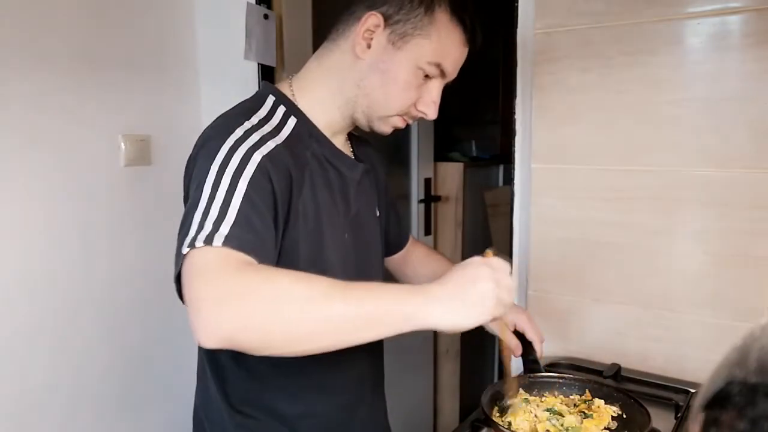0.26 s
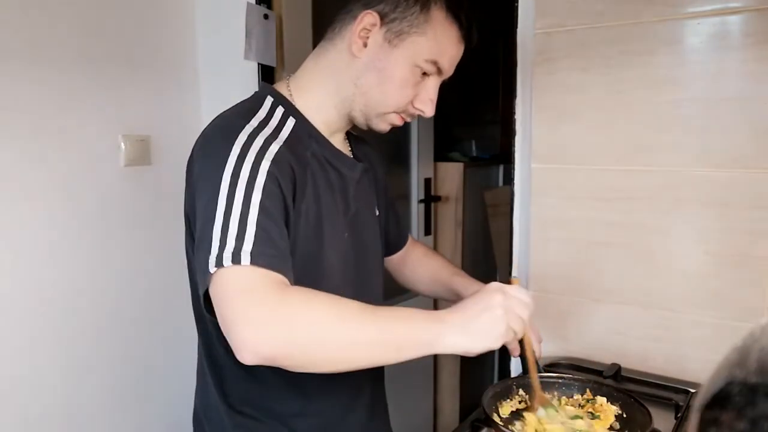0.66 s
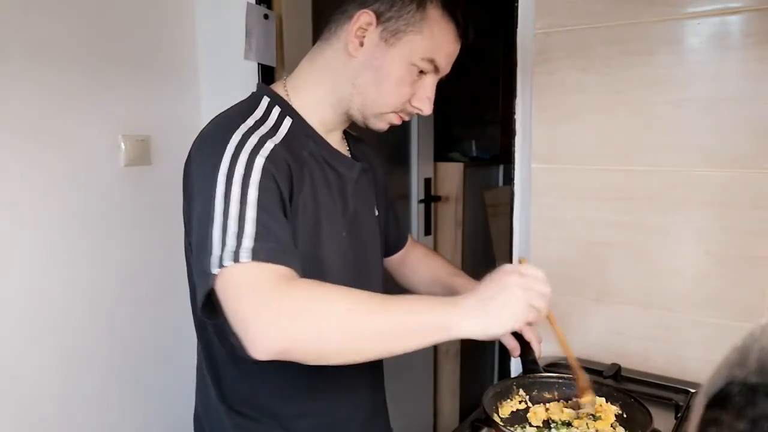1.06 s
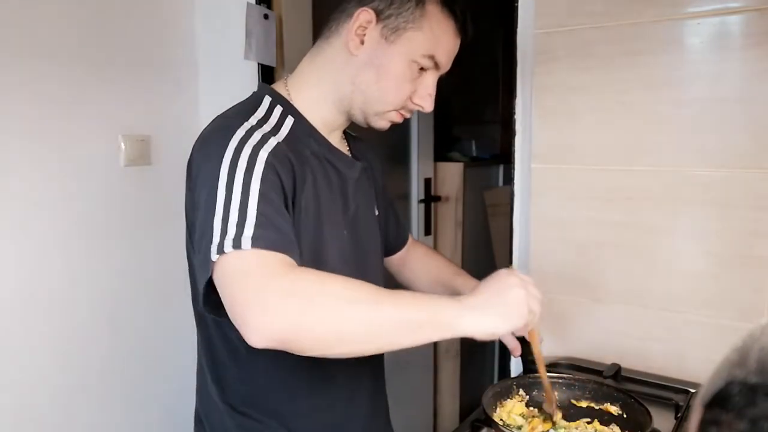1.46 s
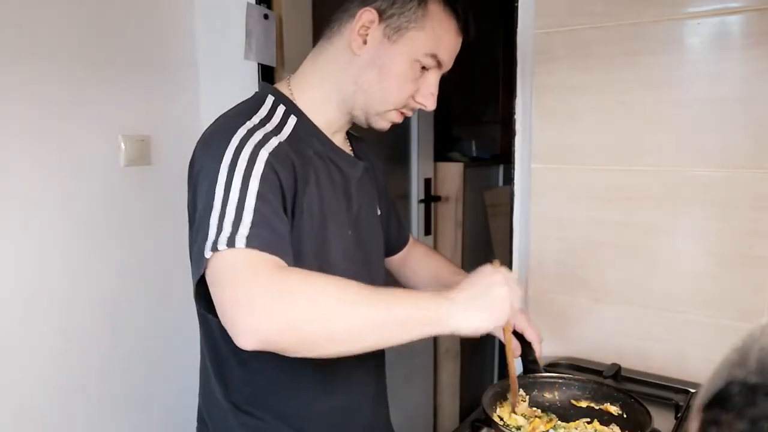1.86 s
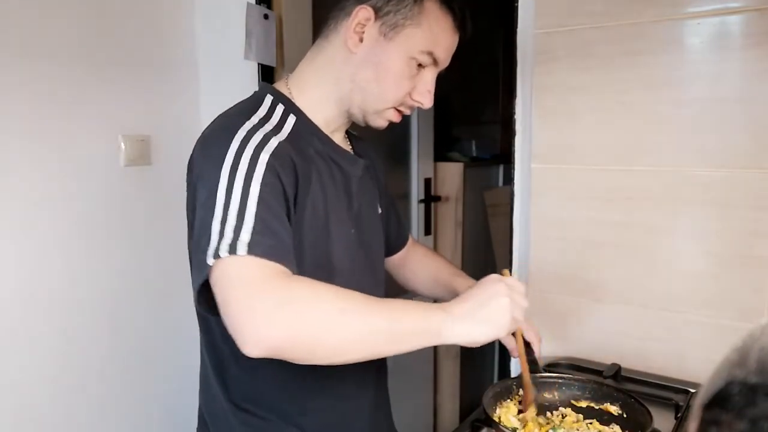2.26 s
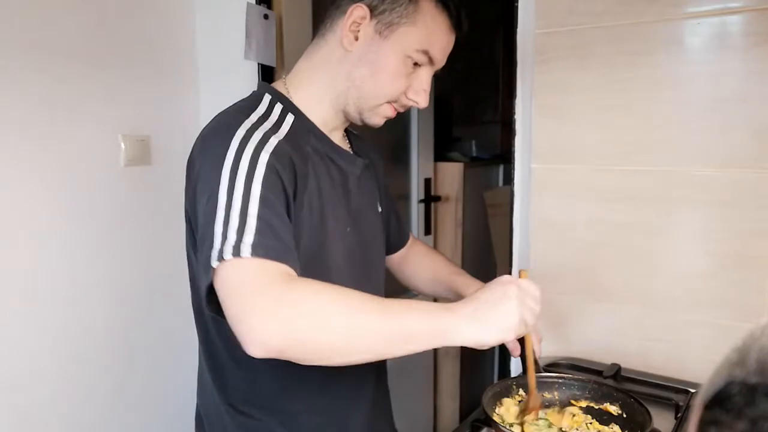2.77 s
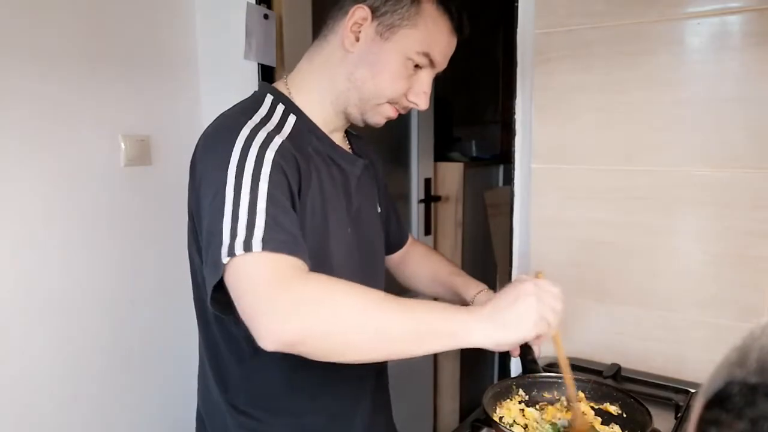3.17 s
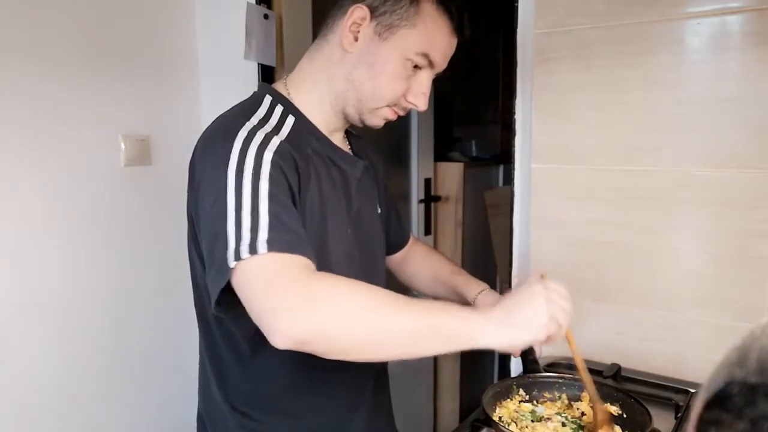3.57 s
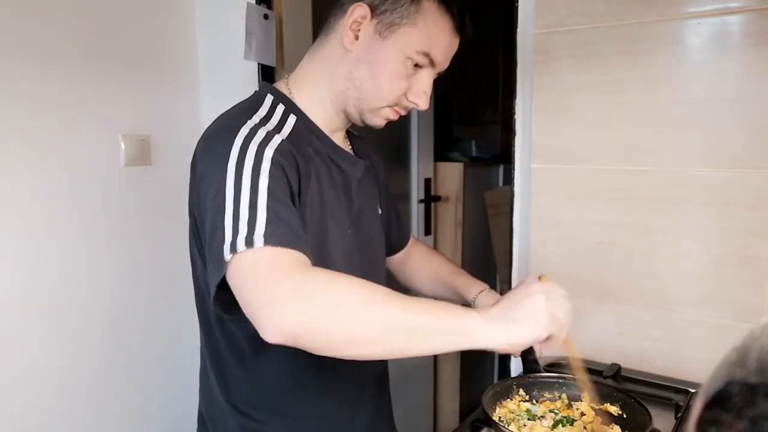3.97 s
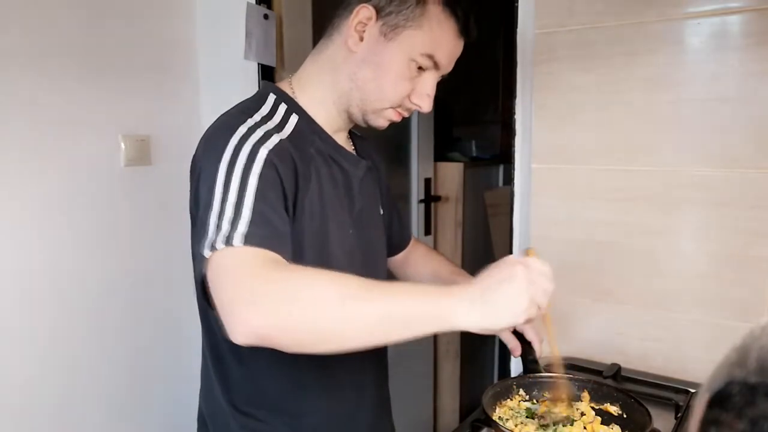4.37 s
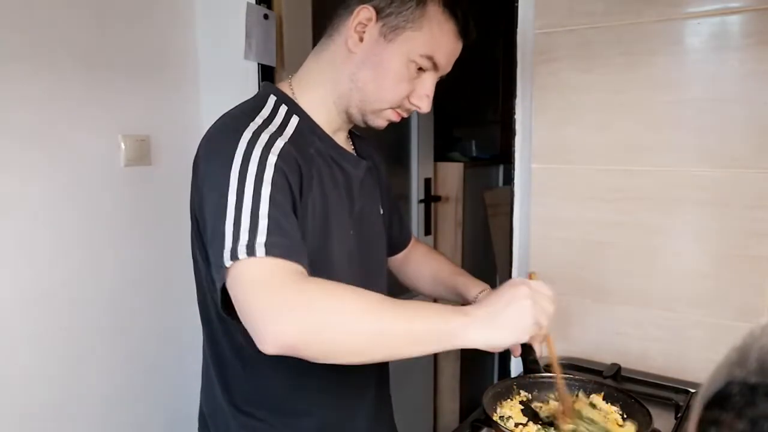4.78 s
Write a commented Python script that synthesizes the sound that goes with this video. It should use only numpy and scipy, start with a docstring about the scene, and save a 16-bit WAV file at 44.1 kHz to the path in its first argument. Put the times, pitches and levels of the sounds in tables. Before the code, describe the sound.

Soft frying and a faint gas hiss run throughout, heard from near the stove in a small, hard-walled kitchen. Light wooden taps and brief scrapes come irregularly as a spatula works eggs around a pan, each stroke bringing a low drone or a dull thump from the stove top. The fat fizzes and spits now and then. Past the middle comes the loudest knock, and a second later another, with a swell of sizzling.

```python
"""Wooden knocks, scrapes and a soft sizzle: a spatula stirs eggs in a frying pan on a gas stove.
Each knock or scrape makes the pan ring. The push of each stroke shakes the stove top into a low drone,
and the pan thumps as it rocks on its grate. Steam bursting in the hot fat fizzes and pops, louder when
the food is turned. Behind it all the flame hisses, and the small hard-walled kitchen echoes briefly."""
import sys
import numpy as np
from scipy import signal
from scipy.fft import rfft, irfft
from scipy.io import wavfile
from scipy.ndimage import uniform_filter1d

SR = 44100
rng = np.random.default_rng(int(sys.argv[2]) if len(sys.argv) > 2 else 0)


def master(y):
    """Save y as 16-bit WAV."""
    cut = np.clip(np.atleast_2d(y).T, -1, 1)
    pcm = np.round(cut * 32767)  # scale
    wavfile.write(sys.argv[1], SR, pcm.astype(np.int16))


N = 221514
T = np.arange(N) / SR

# the pan's modes, the tones it rings with: (pitch [Hz], level [dB], undamped time to fade 60 dB [s])
PAN_MODES = [(578, -14, 0.41), (673, -8, 0.42), (745, 1, 0.034), (823.4, -11.5, 0.34), (908, 0, 0.14),
             (979, 0, 0.066), (1080, -1, 0.03), (1250, 3, 0.03), (1400, 4.5, 0.012), (1517, -8.5, 0.043),
             (1650, -10, 0.071), (1688, 1.5, 0.033), (1879, -3, 0.063), (1934, 4.5, 0.034),
             (2182, 2, 0.032), (2460, -5, 0.045), (2500, -4.5, 0.03), (2820, 2, 0.02), (2950, 3.5, 0.02),
             (3240, -11.5, 0.013), (3416, 4.5, 0.025), (3950, -5, 0.021), (4750, -10, 0.03),
             (4920, -1, 0.025), (5100, -9, 0.025)]


def spatula_knocks():
    """The wooden blade hits the pan and stays on it, which cuts the ring short."""
    # (time [s], peak level [dB], lowest pitch [Hz], highest pitch [Hz], chatter time [ms])
    knocks = [(.394, -41.5, 333, 1090, 13.2), (.445, -39, 576, 2580, 5.5), (.705, -41, 530, 2220, 17),
              (.744, -41.5, 1440, 4030, 6.2), (1.158, -38, 790, 1650, 4.2), (1.217, -41.5, 2590, 4100, 2.6),
              (1.248, -35, 900, 2640, 7), (1.262, -27.5, 485, 2650, 4.2), (1.770, -62, 1600, 2980, 4.2),
              (1.928, -29.5, 635, 1890, 5.2), (2.104, -47, 696, 2190, 5.4), (2.145, -45.5, 2050, 4300, 1.7),
              (2.361, -36, 910, 2260, 10), (2.543, -52, 2520, 4500, 1.6), (2.700, -31, 690, 1570, 14.3),
              (2.846, -45.5, 1700, 2590, 10), (3.098, -39.5, 814, 1390, 9.2), (3.186, -37, 1670, 3180, 1.1),
              (3.448, -47, 1860, 2560, 4.4), (3.625, -13, 1020, 2350, 7.1), (3.642, -22.5, 714, 1330, 8.3),
              (3.998, -30, 1050, 2800, 8.1), (4.111, -33, 1800, 2570, 1.3), (4.207, -43.5, 1490, 2600, 3.4),
              (4.475, -48, 725, 1700, 3.8), (4.616, -18, 654, 2920, 8.4), (4.726, -32.5, 1950, 3780, 5.8),
              (4.912, -46.5, 2080, 2700, 5.7)]
    return blows(knocks, damp(PAN_MODES, 0.63), stereo_rad=0.93, crack_db=-15)


def blows(hits, modes, stereo_rad, crack_db):
    """Each blow is a chatter of tiny bounces that rings the modes; soft wood and food dull its treble."""
    out = np.zeros((2, N + SR))
    t = np.arange(SR // 10) / SR
    for start, db, low_hz, high_hz, chatter_ms in hits:
        age = 1000 * t / chatter_ms
        bounces = rng.standard_normal(len(t)) * (rng.random(len(t)) < .1)
        chatter = bounces * (0.23 + age) * np.exp(-age ** 1.35)  # swells, then dies
        force = keep_range(chatter, 3, [low_hz, high_hz], "band")
        body = signal.fftconvolve(force[None], ring(modes, 0.42, stereo_rad), axes=1)
        body /= np.percentile(np.abs(body[:, :SR // 15]), 99.6)  # peaks near 1
        body[:, :len(t)] += undb(crack_db) * force / np.abs(force).max()  # dry crack of the wood
        add(out, start, undb(db) * body)
    return out[:, :N]


def scrapes_and_rush():
    """Dense, uneven clicks ring the pan's tones, making the spatula's scrapes and one rush of noise."""
    # The row at 3.606 s is a brief, broad rush of noise leading into the loudest knock.
    # In the others the dragged blade sticks and slips; its speed and angle set which tones answer.
    # (start [s], length [s], level [dB], centre pitch [Hz], sharpness [Q])
    rasps = [(0.417, 0.11, -58, 2060, 2.8), (0.497, 0.094, -62, 2620, 3), (0.687, 0.075, -57, 2380, 0.4),
             (0.725, 0.13, -52, 896, 4.4), (0.801, 0.053, -57, 1810, 0.53), (1.211, 0.099, -51.5, 3300, 2),
             (1.28, 0.04, -57, 2340, 2), (1.283, 0.21, -62.5, 830, 1.5), (1.745, 0.048, -60.5, 900, 0.34),
             (1.754, 0.035, -60.5, 2310, 5.9), (1.885, 0.037, -59.5, 2630, 3.7),
             (1.92, 0.19, -56.5, 766, 1.15), (2.095, .08, -64.5, 3550, 1.8),
             (2.447, 0.032, -60.5, 1050, 3.2), (2.682, 0.1, -50, 800, 2.5),
             (2.792, 0.041, -62.5, 2040, 1.6), (2.928, 0.06, -60.5, 2390, 1.6),
             (3.114, 0.15, -64.5, 1080, 2.7), (3.142, 0.087, -51.5, 2610, 3.3),
             (3.606, 0.04, -40, 1370, 0.22), (3.622, 0.029, -35, 4550, 1), (3.64, 0.18, -57.5, 1300, 1.8),
             (3.951, 0.1, -49, 645, 0.54), (4.082, 0.12, -61, 750, 0.65), (4.44, 0.088, -61.5, 1190, 2.3),
             (4.592, 0.062, -44.5, 2310, 1), (4.635, 0.15, -48.5, 2460, 1.1), (4.738, 0.18, -50, 910, 1.55),
             (4.818, 0.07, -63, 2280, 11), (4.896, .07, -67, 2420, 10)]
    out = np.zeros((2, N + SR))
    grit = clicks(2000, 2) * undb(3 * wander(70))
    modes = damp(PAN_MODES, 0.58)  # food and blade shorten the ring
    for start, length, db, hz, q in rasps:
        size = int(length * SR)
        force = grit[int(start * SR):][:size]
        force = resonate(force * signal.windows.tukey(len(force), .6), hz, q)
        body = signal.fftconvolve(force[None], ring(modes, spot_db=1.54, stereo_rad=0.98), axes=1)
        add(out, start, undb(db) * body / np.sqrt(np.mean(body[:, :size] ** 2)))
    return out[:, :N]


def stove_top():
    """Uneven pushes make the stove top drone and rattle; the rocking pan thumps it."""
    # tones of the stove top: (pitch [Hz], level [dB], undamped time to fade 60 dB [s])
    modes = [(150, -14, 0.13), (179, -1.5, 0.076), (225, -3, 0.078), (295.4, -4, 0.15),
             (352.4, -11.5, 0.065), (408.6, -9, 0.091)]
    # pushes of the hand: (peak time [s], swell time [s], drone level [dB], rattle level [dB])
    pushes = [(.11, 0.072, -78, -92), (.22, 0.077, -70.5, -97), (.42, 0.029, -58, -56.5),
              (.54, 0.042, -45.5, -63), (.61, 0.084, -46, -53.5), (.74, 0.076, -52, -53.5),
              (0.971, 0.24, -49.5, -72), (1.332, 0.17, -49, -56), (1.69, 0.031, -83, -71.5),
              (1.95, 0.043, -54.5, -47.5), (2.07, .04, -59.5, -56.5), (2.15, 0.027, -58, -67),
              (2.27, 0.031, -59.5, -68), (2.48, 0.24, -53, -66), (2.72, .04, -57.5, -56),
              (2.86, 0.046, -65, -67), (3.14, .12, -61.5, -73), (3.35, 0.4, -65, -63),
              (3.69, 0.11, -46.5, -46), (4.051, 0.047, -42, -43), (4.5, 0.14, -75.5, -69.5),
              (4.669, 0.075, -48, -47.5), (4.816, 0.015, -36.5, -51)]
    # the pan rocks on its grate: (time [s], peak level [dB], pitch [Hz], chatter time [ms])
    rocks = [(.402, -40, 290, 11), (.515, -46, 226, 24), (.715, -52, 217, 13), (.915, -46, 235, 16.4),
             (1.258, -47, 357, 13), (1.932, -39, 275, 7.6), (2.023, -50.5, 277, 10), (2.371, -47, 274, 4.2),
             (2.702, -45.5, 283, 10), (3.105, -50, 333, 10), (3.235, -41.5, 233, 23), (3.64, -34, 280, 12),
             (3.965, -35, 294, 20), (4.619, -35.5, 303, 8.4), (4.810, -38.5, 212, 2.6)]
    drone_hz, rest_db = 110.4, -79.5  # the lowest tone, and its level between pushes
    peak_s, swell_s, drone_db, rattle_db = np.transpose(pushes)
    phase = 2 * np.pi * np.cumsum(drone_hz + 6 * wander(35)) / SR
    stereo_shift = np.array([[0.24], [-0.24]])
    drone = np.sqrt(2) * np.sin(phase + stereo_shift) * undb(1.8 * wander(45))
    drone *= swells(peak_s, swell_s, drone_db, fade_db_s=189) + undb(rest_db)
    force = unit(clicks(400, 2)) * swells(peak_s, swell_s, rattle_db, fade_db_s=150)
    response = ring(damp(modes, 0.5), spot_db=0, stereo_rad=.9)  # damped by the hand on the handle
    response /= np.sqrt(np.mean(np.sum(response ** 2, 1)))
    rattle = signal.fftconvolve(force[None], response, axes=1)[:, :N]
    span = 1.37  # a thump shakes the tones within this ratio of its pitch
    hits = [(start, db, hz / span, hz * span, ms) for start, db, hz, ms in rocks]
    thumps = blows(hits, damp(modes, 0.76), stereo_rad=0.41, crack_db=-46)
    return keep_range(drone + rattle + thumps, 2, 60, "high")  # too small to give off deep bass


def sizzle():
    """Tiny steam bubbles burst in the fat; the large and small ones flicker separately."""
    # tone of the fizz: (frequency [Hz], level [dB])
    fizz_tone = [(710, -6), (1200, -5), (1420, -5), (1900, 1.5), (2640, -2), (3790, -2.5), (4590, -5.5),
                 (5680, -5.5), (7250, -8.5), (8420, -21.5), (12000, -9), (15300, -34.5)]
    # steady frying: (time [s], level [dB])
    frying = [(0, -62.5), (.4, -71), (.8, -63.5), (1.25, -64), (1.8, -66.5), (2.15, -62), (2.6, -68.5),
              (3.4, -63.5), (3.9, -66), (4.55, -70.5), (5.02, -61.5)]
    # wet food is turned onto hot fat: (peak time [s], swell time [s], level [dB], fade [dB/s])
    flares = [(.45, 0.018, -56, 140), (.62, 0.11, -59.5, 22), (.76, .03, -58.5, 98),
              (1.261, 0.018, -38.5, 330), (2.54, .01, -71, 120), (2.88, 0.13, -55.5, 84),
              (3.23, 0.22, -56.5, 42), (3.63, 0.034, -44, 198), (4.03, 0.12, -60.5, 42),
              (4.36, 0.0066, -62, 57), (4.681, 0.078, -47, 109), (4.78, 0.18, -49, 59)]
    bursts = np.array([clicks(9000, 1.8) for _ in range(3)])  # shared, left, right
    fizz = unit(colour(bursts[0] + 3.2 * bursts[1:], fizz_tone))
    spits = np.abs(clicks(16, 0.99)) * undb(6.5)
    spit_gain = 1 + signal.lfilter([1], [1, -np.exp(-1 / (0.0078 * SR))], spits)  # many faint pops
    level_db = 20 * np.log10(np.hypot(undb(curve(frying)), swells(*np.transpose(flares))))
    steady_db = 0.27 * (-68.5 - level_db)  # large bubbles swell less when the food is turned
    small = keep_range(fizz, 4, 6500, "high") * undb(0.57 * wander(30)) * spit_gain
    large = keep_range(fizz, 4, 6500, "low") * undb(steady_db + 0.86 * wander(30.44))
    return (small + large) * undb(level_db)


def fat_pops():
    """The fat spits: each pop is a short burst of noise with a wet squeak of steam."""
    # (time [s], peak level before filtering [dB], squeak pitch [Hz])
    pops = [(0.4452, -47, 4080), (0.5965, -50.5, 5050), (0.7048, -47, 11700), (0.7442, -46.5, 10500),
            (0.8424, -52, 5600), (1.2503, -33, 4010), (1.7709, -41.5, 12040), (2.116, -43.5, 3570),
            (2.1445, -44, 3660), (2.5441, -47, 3730), (2.8894, -44.5, 3780), (2.9527, -41.5, 3850),
            (3.2191, -46, 7370), (3.3114, -49, 5830), (4.0851, -47, 3630), (4.1111, -49, 6020),
            (4.3585, -51, 3720), (4.6603, -42, 11400), (4.6894, -39, 11100)]
    burst_fade_s, squeak_fade_s = 0.0084, 0.014
    out = np.zeros((1, N + SR))
    t = np.arange(SR // 20) / SR
    for start, db, hz in pops:
        burst, steam = rng.standard_normal((2, len(t)))
        squeak = undb(0.5) * unit(resonate(steam, hz, q=19)) * np.exp(-t / squeak_fade_s)
        pop = burst * np.exp(-t / burst_fade_s) + squeak
        add(out, start, undb(db) * pop[None] / np.abs(pop).max())
    return keep_range(out[:, :N], 2, [3000, 12500], "band")


def kitchen_echo(sound):
    """The tiled walls send back a short, dull wash of echoes."""
    fade_s, echo_db = 0.2, -8.5
    t = np.arange(SR // 3) / SR
    tail = rng.standard_normal((2, len(t))) * undb(-60 * t / fade_s) * (1 - np.exp(-t / 0.00043))
    tail = signal.lfilter([.4], [1, -.6], tail)  # softens the treble
    tail = keep_range(tail, 1, 450, "high")  # the room is too small for a wash of bass
    tail /= np.sqrt(np.sum(tail ** 2, 1, keepdims=True))
    return undb(echo_db) * signal.fftconvolve(sound, tail, axes=1)[:, :N]


def flame_and_air():
    """The gas flame and the room hiss steadily; only the bass is alike on both sides."""
    # tone of the hiss: (frequency [Hz], level [dB])
    hiss_tone = [(20, -54), (36, 14.5), (70, -12), (110, -11), (150, 2.5), (300, -6), (500, -14.5),
                 (900, -4), (1400, -15), (2000, -8.5), (4000, -10.5), (7000, -9), (8500, -15), (12000, -12),
                 (15300, -22)]
    level_db = -64.5
    middle, side = colour(rng.standard_normal((2, N)), hiss_tone)
    side = colour(side, [(100, -6.5), (300, -8), (1200, 1.5)])
    hiss = np.array([middle + side, middle - side])
    return unit(hiss) * undb(level_db + .8 * wander(6))


def ring(modes, spot_db, stereo_rad):
    """Fading tones after one tap; their levels vary by about spot_db with the spot touched."""
    hz, db, fade_s = np.array(modes).T[:, :, None]
    t = np.arange(int(SR * min(fade_s.max(), .2))) / SR
    spot, detune, shift = rng.standard_normal((3, len(modes), 1))
    pitch = hz * (1 + 0.0078 * detune)
    tones = undb(db + spot_db * spot) * np.exp(t * (2j * np.pi * pitch - np.log(1000) / fade_s))
    skew = stereo_rad * shift * np.minimum(hz / 1100, 1) ** 2  # high tones reach the sides out of step
    return np.array([(tones * np.exp(side * 1j * skew)).sum(0).imag for side in (1, -1)])


def damp(modes, share):
    """The same tones, ringing for only a share of their time."""
    return [(hz, db, share * fade_s) for hz, db, fade_s in modes]


def swells(peak_s, swell_s, db, fade_db_s):
    """A loudness curve of events that each swell smoothly to a peak, then fade."""
    power = np.zeros(N)
    for peak, rise, top_db, fade in np.broadcast(peak_s, swell_s, db, fade_db_s):
        up = np.sin(np.pi / 2 * np.clip(1 + (T - peak) / rise, 0, 1)) ** 2
        power += (up * undb(top_db - fade * np.maximum(T - peak, 0))) ** 2
    return np.sqrt(power)


def clicks(per_second, spread_db):
    """Random clicks, mostly small with a few big ones."""
    when, sign, size = rng.random((3, N))
    return (when < per_second / SR) * np.sign(sign - .5) * undb(-spread_db * np.log(1 - size))


def wander(per_second):
    """A value that glides between random points, typically 1 away from zero."""
    step = int(SR / per_second)
    held = np.repeat(rng.standard_normal(N // step + 1), step)
    return unit(uniform_filter1d(held, step)[:N])


def colour(x, points, sign=1):
    """Shape the tone by (Hz, dB) points; sign=-1 swaps boosts and cuts."""
    hz, db = np.transpose(points)
    freqs = np.maximum(np.fft.rfftfreq(x.shape[-1], 1 / SR), 1)
    gain = undb(sign * np.interp(np.log(freqs), np.log(hz), db))
    return irfft(rfft(x) * gain, x.shape[-1])


def keep_range(x, steepness, hz, kind):
    """Keep the "low" side of hz, the "high" side, or the "band" between two pitches."""
    return signal.sosfilt(signal.butter(steepness, hz, kind, fs=SR, output="sos"), x)


def resonate(x, hz, q):
    """Keep the sound near hz; a higher q is narrower."""
    peak = signal.iirpeak(hz, max(q, .3), SR)
    return signal.lfilter(*peak, signal.lfilter(*peak, x))


def curve(points):
    """Join (time, value) points with straight lines."""
    return np.interp(T, *np.transpose(points))


def add(out, start, sound):
    """Mix a sound in at start seconds."""
    at = int(start * SR)
    out[:, at:at + sound.shape[1]] += sound


def undb(db):
    """Turn decibels into a multiplier."""
    return 10 ** (np.asarray(db) / 20)


def unit(x):
    """Scale to an average strength (rms) of 1."""
    return x / np.sqrt(np.mean(x ** 2))


def scene():
    """The cooking, its echo and the background hiss, in stereo."""
    cooking = spatula_knocks() + scrapes_and_rush() + stove_top() + sizzle() + fat_pops()
    left_delay_s = 0.00017  # the left microphone is further from the pan
    cooking[0] = np.interp(T - left_delay_s, T, cooking[0])
    return cooking + kitchen_echo(cooking) + flame_and_air()


def record(dry):
    """Two microphones each tint the tone their own way; the highest treble is cut."""
    # left microphone, the right is its opposite: (frequency [Hz], gain [dB])
    mic_tone = [(60, -1), (130, 2), (300, -2), (600, 0), (1500, 0), (5000, -0.5), (8000, 0.5), (12000, -3)]
    top_hz = 15300
    stereo = np.array([colour(dry[0], mic_tone), colour(dry[1], mic_tone, sign=-1)])
    return signal.sosfilt(signal.ellip(10, .2, 70, top_hz, fs=SR, output="sos"), stereo)


dry = scene()
out = record(dry)
master(out)
```